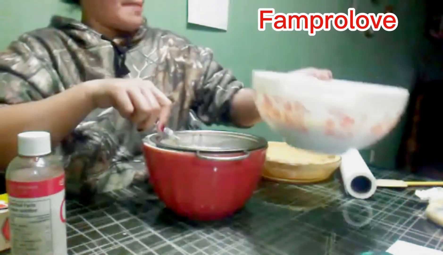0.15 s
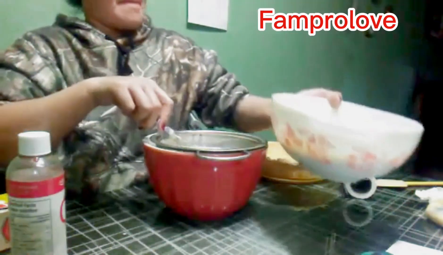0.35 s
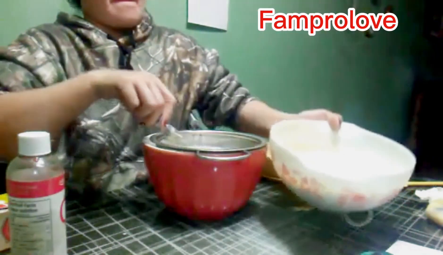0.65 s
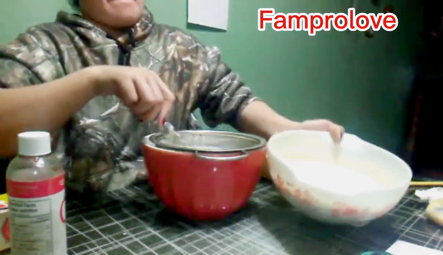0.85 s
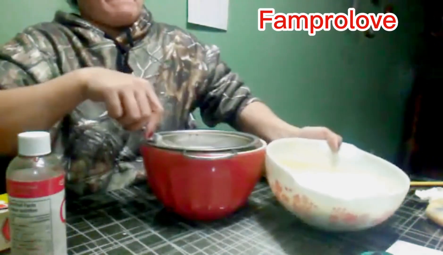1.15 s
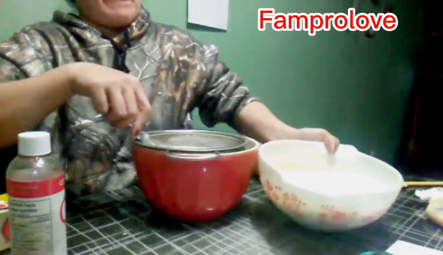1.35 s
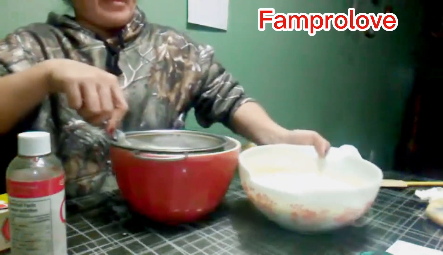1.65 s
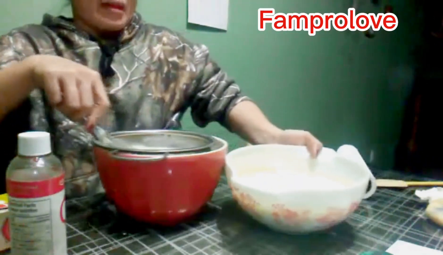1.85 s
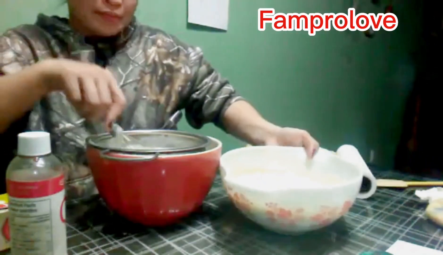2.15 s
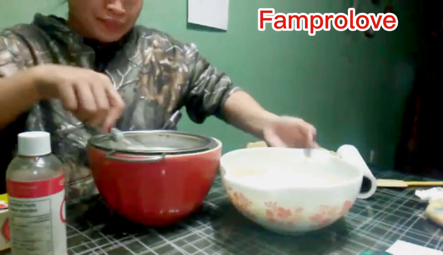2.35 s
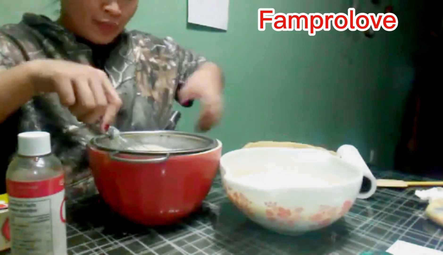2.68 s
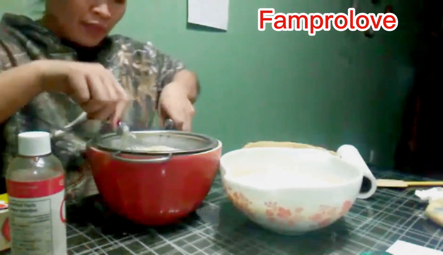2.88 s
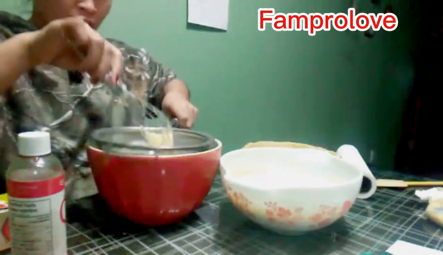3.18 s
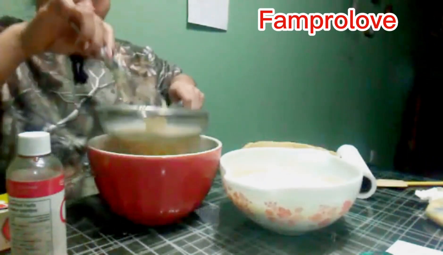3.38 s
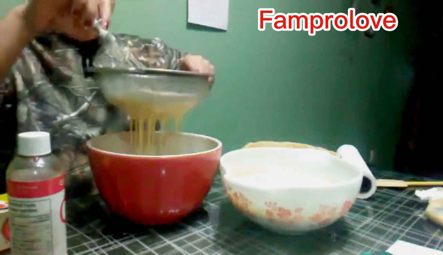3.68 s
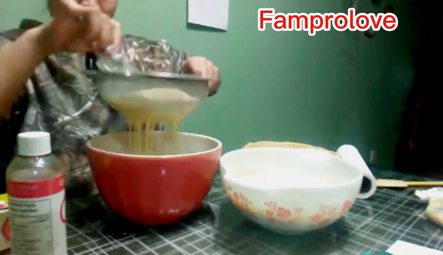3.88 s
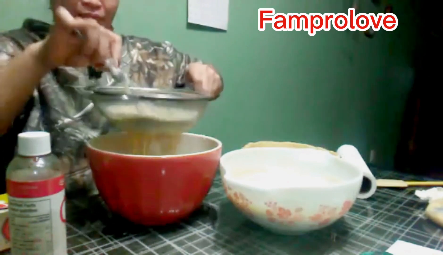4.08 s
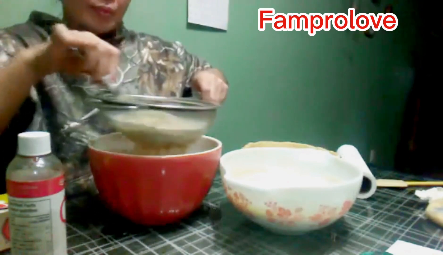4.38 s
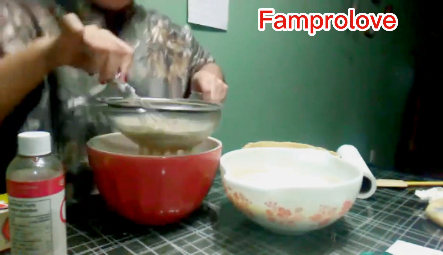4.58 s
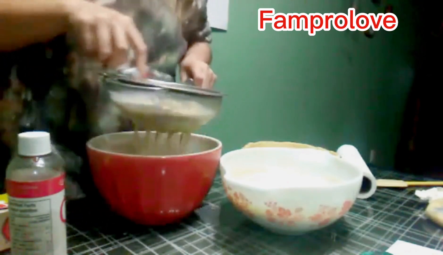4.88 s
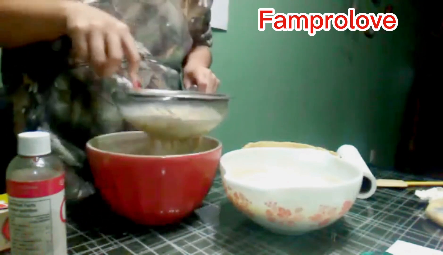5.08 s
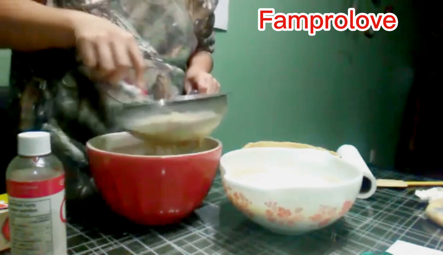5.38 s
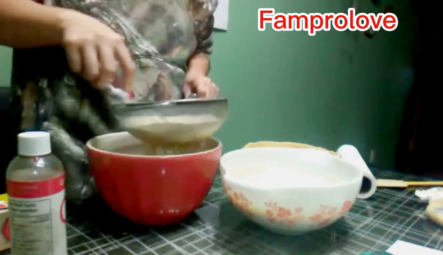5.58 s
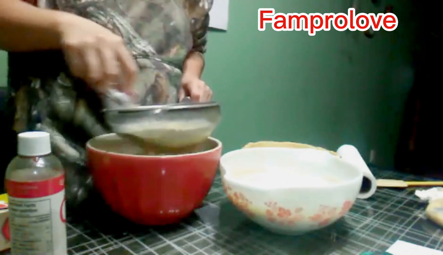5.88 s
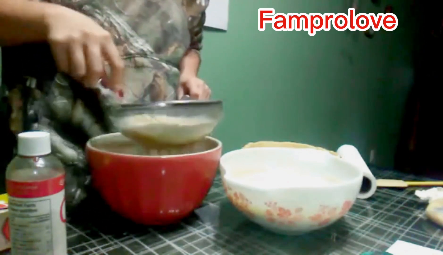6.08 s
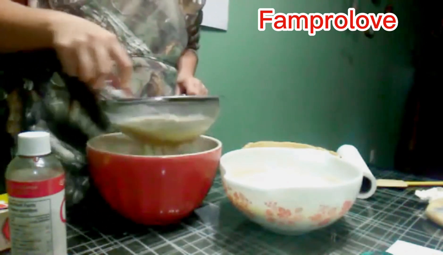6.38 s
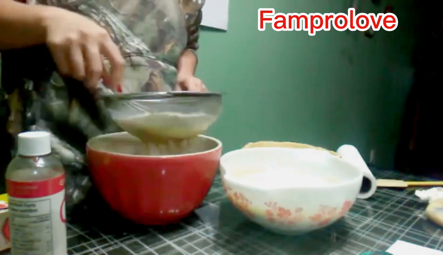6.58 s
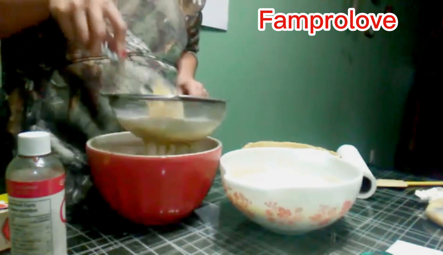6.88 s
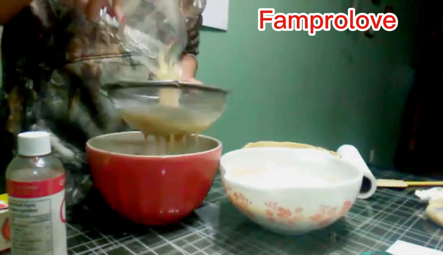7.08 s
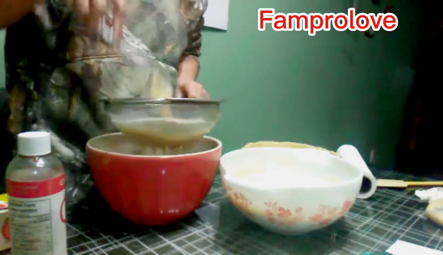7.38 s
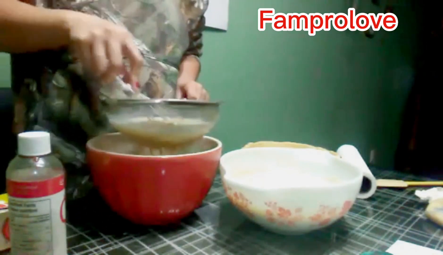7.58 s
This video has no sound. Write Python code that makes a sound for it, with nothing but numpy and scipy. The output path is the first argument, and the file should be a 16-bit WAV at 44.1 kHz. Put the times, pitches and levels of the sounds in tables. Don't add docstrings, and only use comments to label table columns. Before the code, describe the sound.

A glass bowl clinks against another and thuds onto a table, then a wire whisk scrapes briskly over a metal sieve in a humming kitchen.

```python
import sys
import numpy as np
from scipy import signal
from scipy.io import wavfile
from scipy.ndimage import uniform_filter1d, minimum_filter1d

SR = 44100
rng = np.random.default_rng(int(sys.argv[2]) if len(sys.argv) > 2 else 0)


def boost_factor(decibels):
    exponent = np.asarray(decibels, float) / 20
    return 10 ** exponent


def unload_audio(sound):
    columns = np.transpose(np.atleast_2d(sound))
    steps = np.round(np.clip(columns, -1, 1) * 32767)
    wavfile.write(sys.argv[1], SR, steps.astype(np.int16))


N = 341334


def evened(x):
    return x / np.sqrt(np.mean(x ** 2) + 1e-20)


def read(points, hz):
    f, value = np.transpose(points)
    return np.interp(np.log(hz + 1), np.log(f + 1), value)


def add(mix, s, sound):
    part = mix[round(s * SR):][:len(sound)]
    part += sound[:len(part)]


def colour(x, points):
    gain_db = np.maximum(read(points, abs(np.fft.fftfreq(8192, 1 / SR))), -100)
    log_gain = np.log(boost_factor(gain_db))
    phase = -signal.hilbert(log_gain).imag
    taps = np.fft.ifft(np.exp(log_gain + 1j * phase)).real[:4096]
    return signal.oaconvolve(x, taps)[:len(x)]


def resonate(x, hz, width):
    r = np.exp(-np.pi * width / SR)
    return signal.lfilter([1 - r], [1, -2 * r * np.cos(2 * np.pi * hz / SR), r * r], x)


def rubbed(count, hz, width, length):
    noise = rng.standard_normal(count)
    return evened(resonate(resonate(noise, hz, width), hz, width)[-length:])


def patchy(x, depth_db):
    z = signal.stft(x, nperseg=256)[2]
    field = uniform_filter1d(rng.standard_normal(z.T.shape), size=9, axis=0)
    field = uniform_filter1d(field, size=4, axis=1).T
    return evened(signal.istft(z * boost_factor(depth_db * evened(field)), nperseg=256)[1][:len(x)])


def ring(modes, rise=.0006):
    t = np.arange(SR // 2) / SR
    hz, db, t60 = np.transpose(modes)[:, :, None]
    start = rng.random(hz.shape) * np.minimum(hz / 2000, 1)
    level = boost_factor(db - 60 * t / np.clip(t60, .02, .7))
    return (level * np.sin(2 * np.pi * (hz * t + start))).sum(0) * (1 - np.exp(-t / rise))


# hz [Hz], density_db [dB per Hz]
AIR_SPECTRUM = [(20, -37.5), (40, -9.5), (60, -0.5), (90, -22.5), (150, -3.5), (300, -8.5), (600, -19),
                (1000, -17.5), (1500, -24), (4500, -30), (6200, -40.5), (13000, -40.5)]
# pitch_hz [Hz], level_db [dB rms], width_hz [Hz]
APPLIANCE_HUM = [(49.8, -64.5, 8.9), (156.8, -53, 12), (202.6, -63, 7.2), (246, -58.5, 24),
                 (288.6, -68, 16), (370, -68, 0.94), (566, -69.5, 4.9)]
# pitch_hz [Hz], level_db [dB rms]
STEADY_TONES = [(49.6, -53.5), (700, -67)]
# start_s [s], effort_db [dB]
EFFORT = [(0.0, -45.5), (0.58, -45.5), (0.84, -44.5), (1.81, -48.5), (2.95, -40.5), (3.23, -50.5),
          (3.71, -49), (4.3, -52), (4.45, -44), (4.57, -41.5), (5.0, -52), (7.33, -53), (7.74, -47)]


def air():
    t = np.arange(N) / SR
    hiss = boost_factor(-52.5) * evened(colour(rng.standard_normal(N), AIR_SPECTRUM))
    hum = sum(boost_factor(db) * rubbed(N, hz, width, N) for hz, db, width in APPLIANCE_HUM)
    hum += sum(boost_factor(db) * np.sqrt(2) * np.sin(2 * np.pi * hz * t) for hz, db in STEADY_TONES)
    low_shape = [(40, -29), (85, -5), (150, 3), (300, -4), (700, -11.5), (1500, -57)]  # Hz, dB per Hz
    low = evened(colour(rng.standard_normal(N), low_shape))
    s, db = np.transpose(EFFORT)
    effort_db = np.interp(t, s, db)
    rumble = boost_factor(effort_db - 8) * patchy(low, 2.8)
    return boost_factor(0.33 * (effort_db + 47.5)) * hiss + hum + rumble


# hz [Hz], t60_s [s]
ROOM_DECAY = [(100, 0.34), (260, 0.42), (700, 0.54), (1840, 0.51), (4850, 0.54), (9000, 0.56)]


def kitchen(x):
    hz, t, z = signal.stft(rng.standard_normal(SR), SR, nperseg=512)
    decay = boost_factor(-60 * t / read(ROOM_DECAY, hz)[:, None])
    tail = signal.istft(z * decay, SR, nperseg=512)[1]
    tail = tail * np.clip(np.arange(len(tail)) / SR / 0.0027, 0, 1)
    return signal.fftconvolve(x, tail / np.linalg.norm(tail))[:N]


# start_s [s], level_db [dB], pitch_hz [Hz],
# width_hz [Hz], length_s [s]
RIM_SINGS = [(.48, -54, 3150, 100, .06), (.882, -47, 600, 150, .025), (.882, -48, 1250, 200, .025),
             (1.04, -57, 4300, 40, .09), (2.42, -52, 630, 50, .06), (2.625, -52, 1590, 110, .07),
             (2.75, -52, 640, 60, .06), (3.3, -63, 2850, 200, .13), (3.33, -65, 3500, 200, .07),
             (3.7, -58, 2950, 200, .07), (4.74, -50, 640, 60, .03), (6.44, -61, 4430, 150, .2),
             (1.35, -47, 4000, 60, .05), (1.345, -48, 2070, 60, .03), (1.395, -51, 2070, 40, .07),
             (1.85, -53, 3130, 120, .03), (.69, -42, 1790, 50, .025)]


def sings():
    out = np.zeros(N)
    for s, db, hz, width, length in RIM_SINGS:
        t = np.arange(0, length, 1 / SR)
        rub = rubbed(SR, hz, width, len(t))
        add(out, s, boost_factor(db - 12 * t / length) * rub * signal.windows.tukey(len(t), .3))
    return out


# start_s [s], level_db [dB], from_hz [Hz], to_hz [Hz], length_s [s]
LIFT_CHIRPS = [(6.652, -59, 4450, 4420, .033), (6.692, -60, 4420, 4430, .045),
               (6.74, -64, 4450, 4400, .075), (6.82, -66, 4480, 4420, .085), (6.92, -70, 4450, 4420, .07),
               (6.67, -71, 5380, 5620, .085), (6.77, -73, 5430, 5350, .06), (1.19, -63, 4300, 4300, .03)]


def squeaks():
    out = np.zeros(N)
    for s, db, from_hz, to_hz, length in LIFT_CHIRPS:
        t = np.arange(0, length, 1 / SR)
        noise = rng.standard_normal((2, len(t)))
        a, b = uniform_filter1d(uniform_filter1d(noise, size=150), size=150)
        flutter = 1.4 + evened(a) + 1j * evened(b)
        turns = np.cumsum(np.linspace(from_hz, to_hz, len(t))) / SR
        chirp = evened((flutter * np.exp(2j * np.pi * turns)).real)
        add(out, s, boost_factor(db) * chirp * signal.windows.tukey(len(t), .3))
    return out


# start_s [s], level_db [dB], pitch_hz [Hz], length_s [s]
LOADED_WIRES = [(2.274, -48, 4300, 0.025), (2.302, -44, 4960, 0.02), (2.411, -50, 4370, .05),
                (2.52, -42, 4700, 0.025), (2.553, -44, 4270, 0.022), (2.522, -50, 2300, .015),
                (2.725, -56, 4860, .035), (3.776, -47, 3750, 0.039), (3.912, -50.5, 4300, .06),
                (4.032, -54, 4800, .05), (4.158, -49, 4700, .025), (4.19, -54, 4400, .05),
                (4.198, -58, 2240, 0.072), (4.269, -46, 4500, 0.043), (4.385, -55, 4500, .04),
                (4.52, -58, 4700, 0.1), (4.725, -53, 4350, .04), (4.957, -53, 4700, .06),
                (4.979, -51.5, 2140, 0.055), (5.098, -52, 4640, 0.058), (5.24, -64, 3800, 0.058),
                (5.372, -48, 4730, 0.027), (5.41, -50, 3840, 0.019), (5.413, -46, 2300, .015),
                (5.511, -53, 4940, 0.045), (5.756, -47, 4800, .04), (5.757, -46, 2490, 0.048),
                (5.865, -51, 5000, 0.058), (5.868, -54, 2500, 0.018), (6.022, -47, 4900, .05),
                (6.061, -48, 2200, .05), (6.126, -45, 4500, 0.058), (6.283, -49, 4800, 0.037),
                (6.264, -51, 2580, 0.034), (6.349, -47, 4200, .025), (6.391, -52, 3900, 0.025),
                (6.385, -54, 2390, .02), (6.499, -51, 4300, 0.058), (6.509, -50.5, 2000, .04),
                (6.602, -52, 4280, .03), (7.43, -51, 4100, .025), (7.477, -46.5, 3900, .035),
                (7.54, -48, 4160, .04), (7.529, -49, 950, 0.04), (7.62, -50, 3900, .015),
                (7.658, -47.5, 4760, .035)]


def wires():
    out = np.zeros(N)
    sharpness, fade_db = 6.1, -9
    for s, db, hz, length in LOADED_WIRES:
        t = np.arange(0, max(length, .01), 1 / SR)
        rub = rubbed(500 + len(t), hz, hz / sharpness, len(t))
        edges = np.minimum(np.minimum(t / 0.0028, (t[-1] - t) / 0.007), 1)
        add(out, s, boost_factor(db + fade_db * t / length) * rub * edges)
    return out


# start_s [s], peak_db [dB], pitch_hz [Hz]
WIRE_SNAPS = [(0.4927, -53, 3030), (2.7247, -47, 5300), (3.7786, -47, 3430), (4.6295, -29, 5480),
              (4.7593, -27, 3780), (4.863, -36.5, 3430), (5.0991, -41, 4520), (5.374, -37.5, 5070),
              (4.2693, -38, 4300), (6.0144, -41, 4560), (6.1239, -32, 3600), (6.2853, -37, 4500),
              (2.529, -43, 4650), (5.4136, -41, 3770), (5.621, -36, 4430), (5.7578, -37, 4770),
              (5.8692, -34.5, 2450), (7.426, -41, 4880)]


def ticks():
    out, t = np.zeros(N), np.arange(2600) / SR
    puff_shape = [(500, -28), (1500, -4), (5000, -0.5), (6500, -14), (12000, -30)]  # Hz, dB per Hz
    for s, db, hz in WIRE_SNAPS:
        puff = evened(colour(rng.standard_normal(len(t)), puff_shape))
        tone = np.sin(2 * np.pi * hz * t)
        add(out, s, boost_factor(db - 1.5 - 60 * t / 0.026) * (.5 * puff + 0.63 * tone))
    return out


def pressure(t, hold, db):
    press_s, sag_db, lift_db_per_s = 0.02, -4, 311
    press = press_s + 0.93 * min(hold, .1)
    end = max(press_s + hold, press + .005)
    lift_db = lift_db_per_s * np.maximum(t - end, 0)
    held = np.clip((t - press) / (end - press), 0, 1)
    return np.sin(np.pi / 2 * np.clip(t / press, 0, 1)) * boost_factor(db + sag_db * held - lift_db)


# start_s [s], hold_s [s], pressure_db [dB], dull_db [dB relative to the hiss]
BOWL_SLIDES = [(0.205, 0.35, -64, 3), (0.467, 0.033, -47.5, -1), (0.78, 0.049, -71, 17),
               (1.097, 0.12, -72, 3), (1.423, 0.36, -57.5, 4.5), (1.817, 0.026, -52.5, -12),
               (2.021, 0.062, -49.5, 1.5), (2.203, .13, -49.5, 4), (2.372, 0.056, -50.5, 2.5),
               (2.485, 0.058, -48, 3.5), (2.597, 0.12, -53, 0.5), (2.713, 0.055, -49, 2.5),
               (2.844, 0.18, -66.5, 7), (3.312, 0.14, -78, 2), (3.57, 0.044, -70, -3),
               (3.684, .07, -70, -7)]
WHISK_STROKES = [(3.756, 0.035, -49.5, -7), (3.892, 0.069, -50.5, -13), (4.002, 0.06, -57, -1.5),
                 (4.11, 0.11, -50.5, -4), (4.25, 0.03, -44, -3.5), (4.362, 0.088, -51, -4.5),
                 (4.462, 0.14, -55, -5.5), (4.603, 0.051, -47, -5), (4.713, 0.053, -47, -5),
                 (4.812, 0.082, -54, 1), (4.929, 0.081, -50, -4.5), (5.088, 0.065, -54, -1),
                 (5.183, 0.13, -50, -3.5), (5.36, 0.049, -49.5, 0), (5.436, 0.13, -49, -3),
                 (5.609, 0.024, -45.5, -4.5), (5.725, .02, -55, -4), (5.738, 0.045, -47, -5.5),
                 (5.799, 0.037, -46.5, -2), (5.852, 0.037, -46, -2), (5.91, 0.043, -61, -5),
                 (5.978, 0.096, -45, -5), (6.095, .008, -45.5, 0), (6.112, 0.047, -44, -7),
                 (6.241, 0.074, -49, -5), (6.325, 0.071, -47, -3), (6.426, 0.035, -56.5, -1),
                 (6.471, 0.065, -48.5, -4), (6.579, 0.027, -48, -3.5), (7.417, 0.0082, -52, -7),
                 (7.441, 0.12, -47.5, -4), (7.59, 0.03, -55.5, 5), (7.63, 0.076, -49, -4.5),
                 (7.72, .03, -49, 3)]
# hz [Hz], density_db [dB per Hz]
MESH_BRIGHT = [(1650, -19), (2800, -6.5), (3540, -4.5), (4700, -2.5), (5500, -7.5), (6400, -21.5),
               (7670, -27.5), (11000, -34), (14300, -60.5), (22000, -120)]
MESH_DULL = [(240, -41.5), (400, -3.5), (623, 5), (742, -0.5), (972, -3), (1330, -1.5), (2460, 0),
             (3200, -9), (4160, -70.5), (7040, -120)]
# pitch_hz [Hz], level_db [dB], t60_s [s]
RIM_MODES = [(631, -13.5, 0.099), (972, -6.5, 0.09), (1510, -13.5, 0.3), (2400, 0.5, .03), (4400, 2, 0.025),
             (4900, -4, .03)]


def whisk():
    t = np.arange(SR // 2) / SR
    clumps_db = 0.83 * evened(uniform_filter1d(rng.standard_normal(N), 250))
    struck = rng.random((2, N)) < 9000 / SR
    catches = struck * rng.standard_normal((2, N)) * boost_factor(clumps_db)
    high = patchy(colour(catches[0], MESH_BRIGHT), 2.6)
    low = patchy(colour(catches[1], MESH_DULL), 2.5)
    bright, dull = np.zeros(N), np.zeros(N)
    for start, hold, db, dull_db in BOWL_SLIDES + WHISK_STROKES:
        power = pressure(t, hold, db) ** 2
        add(bright, start, power)
        add(dull, start, power * boost_factor(2 * dull_db))
    drive = np.sqrt(bright) * evened(catches[1])
    rim = np.zeros(N)
    for hz, db, t60 in RIM_MODES:
        even_gain = np.sin(2 * np.pi * hz / SR) / np.sqrt(14 / t60 / SR)
        rim += boost_factor(db) * resonate(drive, hz, 2 / t60) * even_gain
    return np.sqrt(bright) * high + np.sqrt(dull) * low + boost_factor(-4) * rim


# start_s [s], peak_db [dB], pitch_hz
# [Hz], t60_s [s]
PLUCKS = [(0.6213, -10, 4530, 0.013), (0.6213, -31, 3000, .02), (0.622, -14, 648, 0.076),
          (0.635, -14, 380, 0.036), (0.9323, -5, 310, 0.039), (0.9350, -14, 2080, 0.017),
          (0.9375, -9, 1550, 0.012), (0.9435, -12, 594, 0.038), (0.9608, -11.5, 260, 0.025),
          (2.1022, -1, 330, 0.015), (2.1025, -7.5, 2300, 0.025), (2.1075, -8.5, 2015, 0.027),
          (2.1093, -3, 820, 0.019), (2.109, -9, 3200, 0.017), (2.1128, -18, 450, 0.015),
          (2.1345, -23, 325, 0.018), (2.146, -20, 1520, .025), (2.152, -15, 245, 0.037),
          (2.17, -14.5, 295, 0.019), (2.188, -20, 354, 0.024), (2.205, -26, 300, .04),
          (2.236, -24.5, 250, .05), (0.951, -18, 423, 0.052), (0.888, -36, 600, 0.024),
          (2.31, -35.5, 640, 0.087), (2.525, -37.5, 370, 0.099), (2.55, -37.5, 638, 0.15),
          (2.655, -49, 1660, .06), (2.77, -41.5, 1573, 0.084), (4.7605, -32, 2200, 0.018),
          (4.63, -34, 2680, .02), (1.2905, -13.5, 4550, 0.013), (1.806, -22.5, 1220, .015),
          (1.806, -25, 2170, 0.014), (1.8067, -27.5, 3180, 0.017), (1.806, -41, 4380, .012),
          (1.806, -44, 5500, .012), (1.8142, -37, 380, 0.031), (1.827, -33, 1230, .02),
          (1.8155, -34.5, 644, .05), (1.838, -33, 560, .03), (2.985, -26, 1670, 0.026),
          (2.992, -41, 630, 0.086), (0.885, -41, 1260, .02), (2.9862, -25.5, 4700, 0.0092),
          (2.9862, -26, 4400, 0.013)]


def contacts():
    out, t = np.zeros(N), np.arange(2600) / SR
    for s, db, hz, t60 in PLUCKS:
        envelope = boost_factor(db - 60 * t / max(t60, .005)) * (1 - np.exp(-t / 0.00056))
        add(out, s, envelope * np.sin(2 * np.pi * hz * t))
    return out


# pitch_hz [Hz], level_db [dB], t60_s [s]
TABLE_TOP = [(141, 2.5, 0.38), (200, -11, 0.25)]
TABLE_FRAME = [(51, -5.5, .45), (86, 4, 0.33)]


def thump(db, frame_db):
    return boost_factor(db) * (ring(TABLE_TOP, rise=0.0036) + boost_factor(frame_db) * ring(TABLE_FRAME, rise=0.02))


# start_s [s], peak_db [dB], hardness_db [dB], frame_db [dB]
TABLE_BUMPS = [(0.89, -30, -9.5, -20), (1.49, -20, 6.5, -0.5), (2.522, -49, 13, 12), (2.786, -48, 7, 15.5),
               (2.974, -36, 7, -17), (4.39, -37, -14, 2), (4.442, -30.5, -16, 7), (4.502, -21.5, -14, -3),
               (5.043, -42, -8, -27), (6.708, -45, 9, -28.5), (7.514, -29.5, -17, -35)]


def bumps():
    out, t = np.zeros(N), np.arange(SR // 2) / SR
    push = np.exp(-t / 0.0025) * (1 - np.exp(-t / 0.0018)) * np.sin(2 * np.pi * 290 * t)
    for s, db, hard_db, frame_db in TABLE_BUMPS:
        add(out, s, thump(db - 8.5, frame_db) + boost_factor(db + hard_db + 4) * push)
        add(out, s + .015, -boost_factor(db + hard_db) * push)
    return out


# start_s [s], thump_db [dB], clatter_t60_s [s], rattle_db [dB], frame_db [dB]
IMPACTS = [
    (0.62, -18.5, 0.089, -8, -3),
    (0.9317, -8.5, 0.092, -14, -4.5),
    (1.289, -29.5, 0.0099, -8, 5),
    (1.8046, -28, 0.013, -6, -5.5),
    (2.1026, -16, 0.065, -10, 4),
    (2.9844, -33, 0.12, -1, -8),
]
CLATTER_DB = [-18.5, -16, -22, -35.5, -8.5, -37.5]
FIRST_CRACK_DB = [3, -15, -3.5, -16, 2.5, -10]
CONTACT_RISE_S = [.001, .006, .0005, .001, .005, .0015]
# hz [Hz], density_db [dB per Hz]
CLATTER_SPECTRA = [
    [(250, -1), (470, -12), (680, 4), (960, -5.5), (1300, -3), (4700, -12), (5500, -35), (6500, -24.5),
     (9000, -56)],
    [(150, -10), (330, -0.5), (800, -4), (2200, -16.5), (2900, -18.5), (4600, -20), (6500, -35),
     (9000, -66)],
    [(250, 2.5), (450, -5.5), (1300, 0.5), (3000, -2.5), (4800, -3.5), (5600, -15.5), (6500, -16),
     (9000, -43)],
    [(150, -25), (300, 1.5), (900, -8), (3000, -7), (5200, -17.5), (6500, -33.5), (9000, -38.5)],
    [(150, -14), (300, -6), (1700, -5), (2500, -14), (3700, -11.5), (5500, -23.5), (6500, -34), (9000, -65)],
    [(200, 7.5), (400, -0.5), (1200, -5), (3300, -17), (4800, -29), (5600, -20), (6500, -19), (9000, -39)],
]
# hz [Hz], level_db [dB]
RATTLE_SPECTRUM = [(500, 0.5), (2000, -1.5), (4800, -1.5), (5600, -0.5), (6500, -12)]
# pitch_hz [Hz], level_db [dB], t60_s [s]
GLASS_FIRST = [(1366, -31, 0.16), (355, -27, 0.29), (620, -25.5, .13), (669, -30, 0.2), (1150, -26.5, 0.12),
               (2075, -33.5, 0.55), (1782, -22, 0.13), (2097, -23.5, 0.17), (2853, -31, .17),
               (3180, -21.5, 0.082), (4040, -28.5, 0.18), (4560, -38, .12), (265, -38, 0.26),
               (6200, -43.5, 0.075), (8016, -55, 0.13)]
GLASS_SECOND = [(262, -43, 0.35), (638, -19, 0.1), (1120, -26.5, 0.085), (2056, -23.5, 0.14),
                (2820, -31, 0.089), (3165, -41, .3), (3980, -39.5, 0.18), (4130, -32.5, .1),
                (4250, -26.5, 0.099), (4660, -27.5, 0.06), (3474, -28, 0.046), (5260, -43, .15),
                (6030, -46.5, 0.11), (8020, -57, 0.089)]
GLASS_THIRD = [(270, -38, .2), (624, -38, .14), (565, -43, .2), (1168, -42, .08), (2078, -45, .12),
               (2400, -46, .05), (3133, -46, .2)]
SIEVE_MODES = [(635, -33, .2), (900, -41, .1), (565, -46, .3), (1567, -36, .45), (205, -39, .4),
               (270, -39, .3), (4285, -38, .16), (1840, -43, .05), (5150, -32, .02), (6030, -52, .2),
               (8027, -62, .17), (2783, -52, .15)]
BASE_FIRST = [(265, -14, 0.098), (200, -26, 0.18), (330, -16, .05), (450, -17, 0.14), (600, -24, 0.13),
              (758, -25.5, 0.16), (1390, -29, 0.09), (1611, -24, 0.12), (2300, -24, .05),
              (938, -27.5, 0.18), (369, -28, .2)]
BASE_SECOND = [(195, -19.5, 0.36), (278.6, -3.5, 0.062), (374, -26.5, 0.12), (603, -11, .1),
               (516, -13, 0.075), (252.6, -24.5, 0.28), (824, -12, 0.072), (950, -22, 0.25),
               (1221, -9, 0.058), (1500, -17, 0.084), (1600, -17.5, .12), (1705, -18, .14),
               (2062, -15.5, .05), (2950, -25, .12), (3370, -24.5, .13)]


def knocks():
    out, rung, t = np.zeros(N), np.zeros(N), np.arange(SR // 2) / SR
    vessels = [GLASS_FIRST, BASE_FIRST, GLASS_SECOND, GLASS_THIRD, BASE_SECOND, SIEVE_MODES]
    events = zip(IMPACTS, CLATTER_DB, vessels, CLATTER_SPECTRA, CONTACT_RISE_S, FIRST_CRACK_DB)
    for (s, table_db, t60, tail_db, frame_db), db, modes, shape, rise, crack_db in events:
        uneven_db = 1.8 * np.minimum(rng.exponential(1, len(t)), 4.5)
        blow = evened(colour(rng.standard_normal(len(t)) * boost_factor(uneven_db), shape))
        crack = boost_factor(crack_db - 60 * t / .016)
        body = boost_factor(-0.5 - 60 * t / max(t60, .01))
        rattle = colour(blow, RATTLE_SPECTRUM) * boost_factor(tail_db - 60 * t / 0.39)
        clatter = (blow * (crack + body) + rattle) * (1 - np.exp(-t / rise))
        tick = boost_factor(-39 - 60 * t / 0.03) * rng.standard_normal(len(t))
        add(out, s, boost_factor(db) * (clatter + tick) + thump(table_db - 9, frame_db))
        add(rung, s, ring(modes, rise / 2))
    return out, rung


def scene():
    blows, rung = knocks()
    hits = blows + bumps() + ticks() + contacts()
    rubs = whisk() + sings() + wires() + squeaks()
    room = kitchen(boost_factor(-10) * hits + boost_factor(-15) * rung + boost_factor(-8) * rubs)
    mono = hits + rung + rubs + room + air()
    mono = signal.sosfilt(signal.butter(2, 32, "high", fs=SR, output="sos"), mono)
    return np.array([mono, mono])


def roll_off(x):
    return signal.sosfilt(signal.butter(12, 13390, fs=SR, output="sos"), x)


def record(dry):
    treble = colour(dry[0], [(3000, -64), (4500, -4.5), (13000, 0)])
    swell = np.sqrt(abs(uniform_filter1d(treble ** 2, 600)))
    steady_shape = [(3000, -60.5), (5000, -7.5), (6500, 1.5), (13000, -2.5)]  # Hz, dB per Hz
    steady = boost_factor(-74.5) * evened(colour(rng.standard_normal(N), steady_shape))
    moving_shape = [(3200, -85.5), (4200, -4), (5200, 6), (6500, -12), (13000, -47)]
    moving = boost_factor(-8.5) * swell * evened(colour(rng.standard_normal(N), moving_shape))
    room_left = np.minimum(1, .97 / (abs(dry[0]) + 1e-9))
    limit = uniform_filter1d(minimum_filter1d(room_left, size=48), size=24)
    out = dry * limit + (steady + moving) * np.array([[1], [-1]])
    out = signal.oaconvolve(out, signal.firwin(511, 13150, fs=SR)[None], "same")
    return roll_off(out - .0011)


dry = scene()
out = record(dry)
unload_audio(out)
```